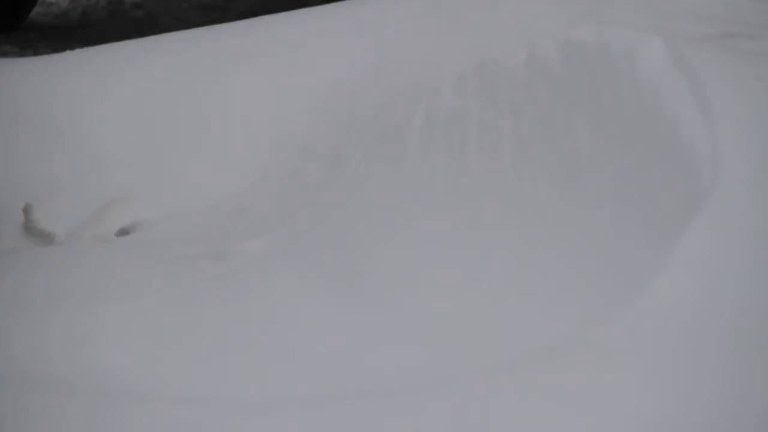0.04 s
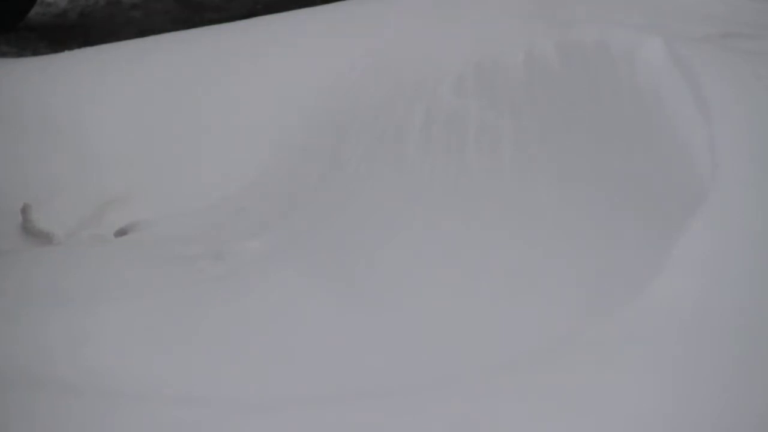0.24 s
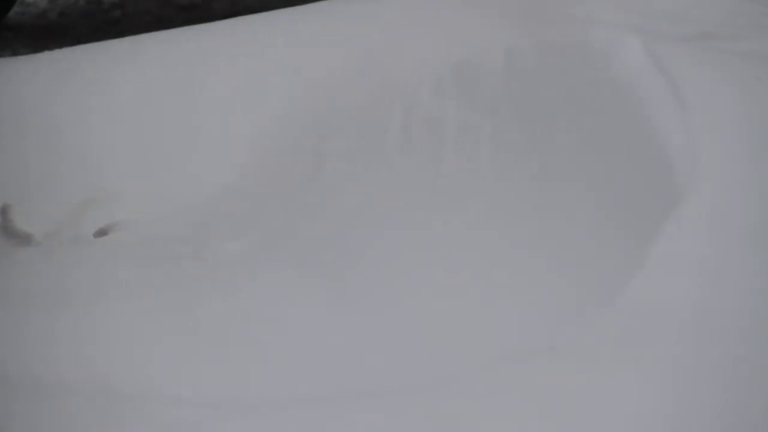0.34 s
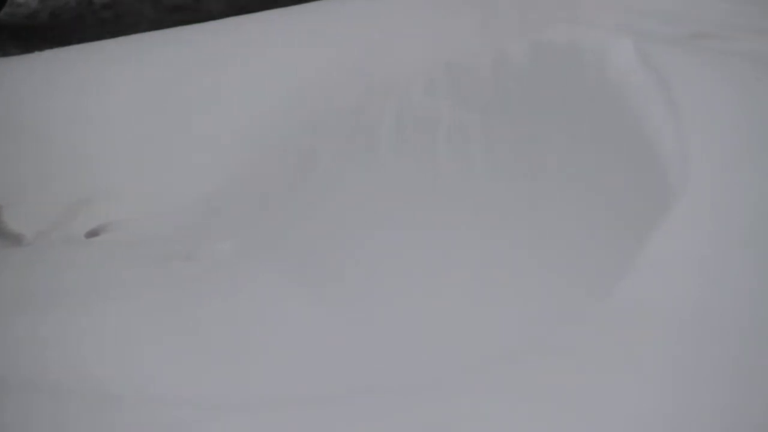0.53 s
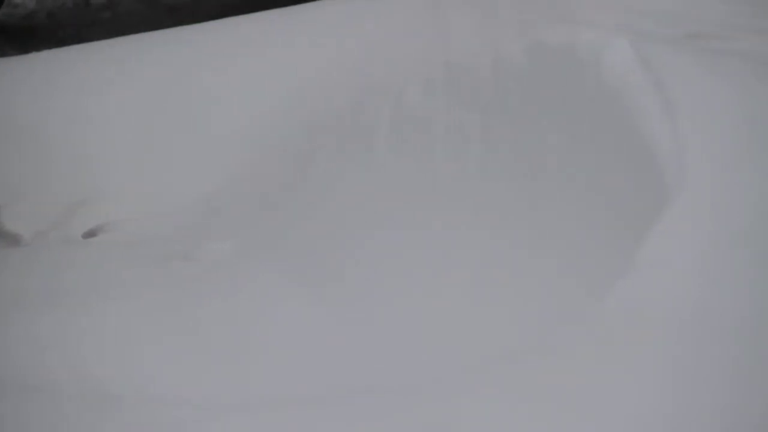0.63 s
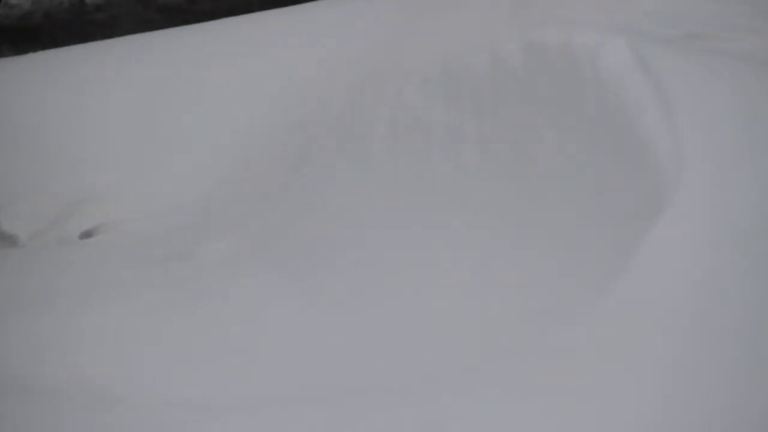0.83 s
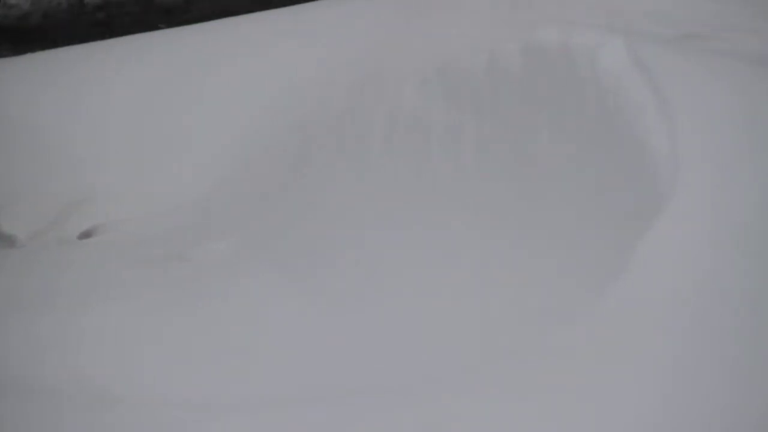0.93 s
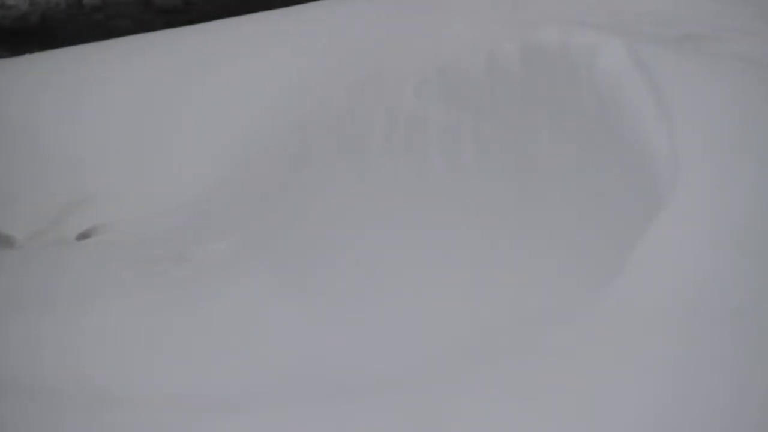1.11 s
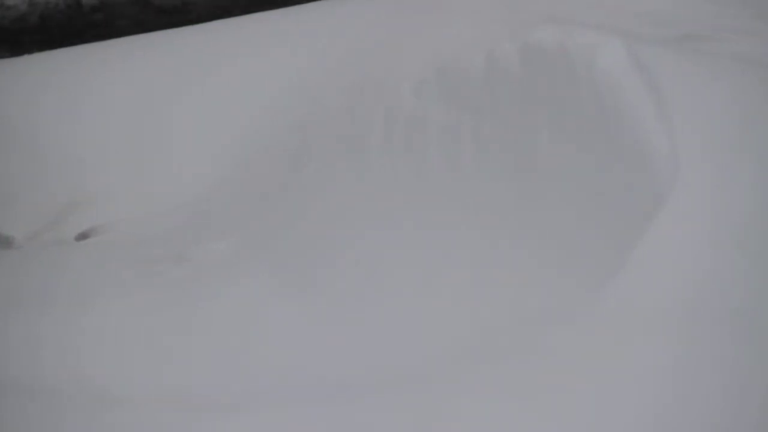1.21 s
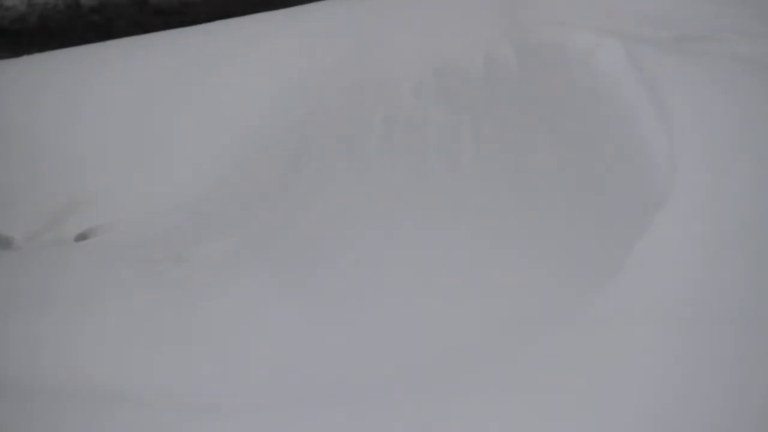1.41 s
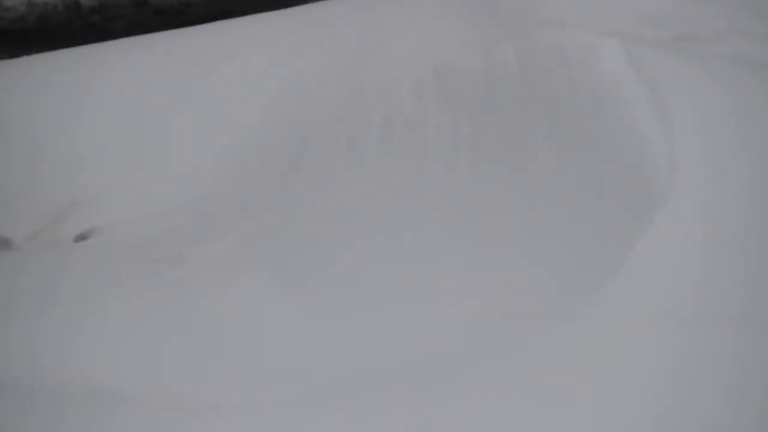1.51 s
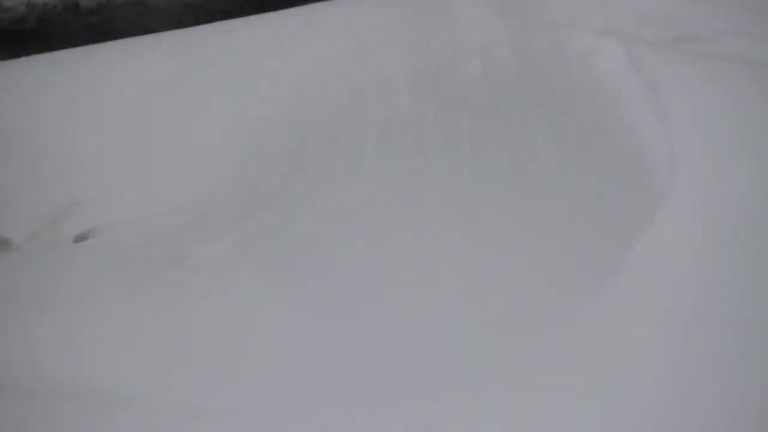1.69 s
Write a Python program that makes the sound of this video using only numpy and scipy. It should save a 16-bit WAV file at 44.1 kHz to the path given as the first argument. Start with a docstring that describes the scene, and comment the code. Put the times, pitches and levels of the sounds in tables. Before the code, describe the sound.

Light wind rumbles and buffets the microphone, with a faint hiss of drifting snow.

```python
"""Light wind over a snow field. From the start, air rushes softly, drifting snow hisses and single grains
tick nearby, while turbulence rumbles at the microphone port and eddies buffet it with short low thuds.
The hardest thud comes at 0.36 s. After 1 s the thuds crowd together, the rush grows and one soft bump
rings the housing. Towards the end a gust brings a coarser sweep of snow and the rumble falls away."""
import sys
import numpy as np
from scipy import signal
from scipy.fft import rfft, irfft, next_fast_len
from scipy.io import wavfile

SR = 44100
rng = np.random.default_rng(int(sys.argv[2]) if len(sys.argv) > 2 else 0)


def master(y):
    """Save y as 16-bit WAV."""
    cut = np.clip(np.atleast_2d(y).T, -1, 1)
    pcm = np.round(cut * 32767)  # scale
    wavfile.write(sys.argv[1], SR, pcm.astype(np.int16))


N = 77175
T = np.arange(N) / SR


# Eddies at the port: centre_s, peak_db, pitch_hz, half_length_s
PORT_EDDIES = [(0.082, -23, 78, 0.011), (0.086, -31, 334, 0.0019), (0.102, -21.5, 126, .005),
               (0.318, -26, 74, 0.017), (0.362, -10, 136.3, 0.008), (0.416, -21.5, 92, .009),
               (0.516, -20, 317, 0.0013), (0.524, -27.5, 137, .011), (0.653, -28, 334, 0.0018),
               (0.661, -20, 115, 0.011), (0.723, -25, 117, .012), (1.035, -29.5, 110, 0.0069),
               (1.102, -25, 223, 0.0036), (1.169, -14, 145, 0.0062), (1.176, -21.5, 251.4, 0.0095),
               (1.204, -12.5, 154, 0.0038), (1.206, -24.5, 352, 0.0024), (1.296, -15.5, 105, 0.0034),
               (1.306, -19.5, 164, 0.0046), (1.342, -28, 191, 0.0082), (1.383, -15.5, 160, .005),
               (1.412, -19, 97, .006), (1.432, -22.5, 256, 0.0027), (1.458, -29, 170, 0.0064)]
# Wake spectrum: freq_hz, density_db
WAKE_SPECTRUM = [(25, -10), (60, -2.5), (130, 0.5), (250, -4.5), (450, -10.5), (800, -30.5), (1600, -52)]

def buffets(push_db=-8.5, push_pitch_ratio=0.46, wake_db=-13.5, wake_length_ratio=1.93, leak_hz=30):
    """Each eddy swings the port pressure for a cycle or two, pushes more slowly and churns a wake."""
    pressure, wake_power = np.zeros(N), np.zeros(N)
    for centre_s, peak_db, pitch_hz, half_length_s in PORT_EDDIES:
        swing_phase, push_phase = rng.random(2)
        age_s = T - centre_s
        swell = from_db(peak_db) * (1 + .5 * (age_s / half_length_s) ** 2) ** -2
        swing = np.sin(2 * np.pi * (pitch_hz * age_s + swing_phase))
        push = np.sin(2 * np.pi * (push_pitch_ratio * pitch_hz * age_s + push_phase))
        pressure += swell * (swing + from_db(push_db) * push)
        wake_s = half_length_s * wake_length_ratio
        wake_power += from_db(peak_db) ** 2 * np.exp(-2 * np.abs(age_s) / wake_s)
    wake = from_db(wake_db) * np.sqrt(wake_power) * noise(WAKE_SPECTRUM)
    # Slow pressure changes leak past the diaphragm.
    leak = signal.butter(2, leak_hz, "high", fs=SR, output="sos")
    return signal.sosfilt(leak, pressure) + wake


# Rumble envelope: time_s, level_db
RUMBLE_ENVELOPE = [(0, -40.5), (.2, -40.5), (.4, -36.5), (.58, -43), (.82, -40), (.95, -37.5), (1.1, -39.5),
                   (1.25, -34.5), (1.45, -35), (1.62, -44), (1.75, -48)]
# Rumble spectrum: freq_hz, density_db
RUMBLE_SPECTRUM = [(20, -31), (40, -3.5), (80, -0.5), (130, -6), (200, -12.5), (350, -28.5), (700, -24.5)]

def port_rumble():
    """Continuous turbulence at the microphone port."""
    return envelope(RUMBLE_ENVELOPE) * noise(RUMBLE_SPECTRUM) * flutter(depth_db=2.5, rate_hz=13.3)


# Rush envelope: time_s, level_db
RUSH_ENVELOPE = [(0, -45.5), (.3, -44), (.6, -44), (.95, -44), (1.2, -40.5), (1.4, -42), (1.55, -42),
                 (1.75, -43.5)]
# Rush spectrum: freq_hz, density_db
RUSH_SPECTRUM = [(100, -2.5), (250, 1.5), (420, 0), (650, -5), (1000, -11), (1600, -18), (2600, -24.5),
                 (5000, -40), (10000, -40)]

def air_rush():
    """Air flows unsteadily over the field."""
    return envelope(RUSH_ENVELOPE) * noise(RUSH_SPECTRUM) * flutter(depth_db=0.96, rate_hz=9.7)


# Hiss envelope: time_s, level_db
HISS_ENVELOPE = [(0, -49), (.4, -49.5), (.58, -48.5), (.75, -49.5), (1.0, -49), (1.3, -49), (1.5, -48.5),
                 (1.75, -46.5)]
# Hiss spectrum: freq_hz, density_db
HISS_SPECTRUM = [(1000, -20), (2500, -9), (4500, -5), (6500, -6.5), (9000, -3), (11500, 0), (13000, 1),
                 (14500, -3.5), (16000, -10.5)]

def snow_hiss(grains_per_s=700, spread_db=4.5, grains_db=-9.5, t60_cycles=4.5):
    """Fine drifting snow: a smooth hiss plus countless tiny ringing impacts."""
    sizes = from_db(spread_db * np.minimum(rng.exponential(1, N), 5))
    signs = rng.choice([-1, 1], N)
    clicks = sizes * signs * (rng.random(N) < grains_per_s / SR)
    pitches_hz = np.geomspace(7000, 14500, 10)
    pitch_index = rng.integers(0, len(pitches_hz), N)
    grains = sum(ring(clicks * (pitch_index == k), hz, t60_cycles / hz)
                 for k, hz in enumerate(pitches_hz))
    return envelope(HISS_ENVELOPE) * (noise(HISS_SPECTRUM) + from_db(grains_db) * unit_rms(grains))


# Sweep envelope: time_s, level_db
SWEEP_ENVELOPE = [(0, -67), (1.0, -66), (1.25, -60.5), (1.48, -53.5), (1.63, -46.5), (1.75, -50.5)]
# Sweep spectrum: freq_hz, density_db
SWEEP_SPECTRUM = [(500, -11), (1200, 8), (2200, -0.5), (3500, -0.5), (5000, 0.5), (7500, -12),
                  (12000, -1.5), (16000, -16)]

def snow_sweep():
    """A late gust drives a coarser sweep of snow."""
    return envelope(SWEEP_ENVELOPE) * noise(SWEEP_SPECTRUM)


# Grain landings: start_s, level_db, centre_hz, t60_s, bandwidth_ratio
GRAIN_LANDINGS = [(0.127, -43, 10000, .010, .6), (0.1443, -35.5, 10800, .010, .45),
                  (0.333, -45, 4800, 0.048, 0.44), (0.421, -45, 4800, .025, 0.55),
                  (0.500, -44, 8000, .005, .9), (0.521, -40, 7000, .007, 1.1),
                  (0.812, -37, 11000, .012, 0.57), (0.994, -38, 10100, 0.022, 0.88),
                  (1.085, -41.5, 2370, 0.018, .4), (1.105, -35, 10650, .018, .12),
                  (1.193, -38, 9000, 0.0064, 0.45), (1.340, -40.5, 6000, 0.0058, 1.2),
                  (1.361, -39, 2000, 0.017, .9)]

def grain_ticks():
    """Larger grains land near the microphone, one noise burst each."""
    return sum(from_db(level_db) * burst(start_s, centre_hz, t60_s, bandwidth_ratio)
               for start_s, level_db, centre_hz, t60_s, bandwidth_ratio in GRAIN_LANDINGS)


# Housing modes: pitch_hz, level_db, t60_s
HOUSING_MODES = [(355, -1, 0.045), (593, 0.5, 0.048), (727, -1, 0.033), (925, -8.5, 0.052),
                 (1368, -6, 0.047), (2120, -11, 0.029), (2700, -15.5, .018), (3270, -15.5, 0.014)]

def housing_bump(start_s=1.1858, body_db=-27, crunch_db=-33):
    """A soft knock rings the housing, with a short crunch at the contact."""
    click = np.zeros(N)
    click[int(start_s * SR)] = 1
    body = sum((-1) ** k * from_db(level_db) * ring(click, pitch_hz, t60_s)
               for k, (pitch_hz, level_db, t60_s) in enumerate(HOUSING_MODES))
    crunch = burst(start_s, centre_hz=2080, t60_s=0.017, bandwidth_ratio=1.1)
    return from_db(body_db) * body + from_db(crunch_db) * crunch


def from_db(db):
    """Decibels to gain."""
    return 10 ** (np.asarray(db) / 20)


def unit_rms(x):
    """Scale to rms 1."""
    return x / np.sqrt(np.mean(x ** 2) + 1e-20)


def envelope(points):
    """Gain over time from time_s, level_db points."""
    return from_db(np.interp(T, *np.transpose(points)))


def noise(spectrum):
    """Noise of rms 1 shaped by freq_hz, density_db points, rolled off beyond both ends."""
    freq_hz, density_db = np.transpose(spectrum)
    size = next_fast_len(N)
    bins_hz = np.maximum(np.arange(size // 2 + 1) * SR / size, 1)
    gain = from_db(np.interp(np.log(bins_hz), np.log(freq_hz), density_db))
    rolloff = np.minimum(bins_hz / freq_hz[0], 1) * np.minimum(freq_hz[-1] / bins_hz, 1) ** 2
    return unit_rms(irfft(rfft(rng.standard_normal(size)) * gain * rolloff, size)[:N])


def flutter(depth_db, rate_hz):
    """Random unsteadiness of the flow, as a gain; depth_db is rms."""
    hop, settle_steps = 40, 2000
    pole = np.exp(-2 * np.pi * rate_hz * hop / SR)
    white = rng.standard_normal(N // hop + 2 + settle_steps)
    slow = signal.lfilter([1], [1, -2 * pole, pole * pole], white)[settle_steps:]
    drift = np.interp(np.arange(N) / hop, np.arange(len(slow)), unit_rms(slow))
    return from_db(depth_db * drift)


def ring(clicks, pitch_hz, t60_s):
    """Resonator: a unit click starts a decaying sine of height 1."""
    radius = from_db(-60 / (t60_s * SR))
    step_rad = 2 * np.pi * pitch_hz / SR
    feedback = [1, -2 * radius * np.cos(step_rad), radius * radius]
    return signal.lfilter([0, np.sin(step_rad)], feedback, clicks + 1e-18)


def burst(start_s, centre_hz, t60_s, bandwidth_ratio):
    """A sudden, decaying puff of noise in one band."""
    edge_ratio = 1 + bandwidth_ratio / 2
    edges_hz = [centre_hz / edge_ratio, min(centre_hz * edge_ratio, .45 * SR)]
    band = signal.butter(2, edges_hz, "band", fs=SR, output="sos")
    decay = (T >= start_s) * from_db(-60 * np.maximum(T - start_s, 0) / t60_s)
    return decay * unit_rms(signal.sosfilt(band, rng.standard_normal(N)))


def scene():
    """All sources at one microphone."""
    wind = port_rumble() + air_rush() + buffets()
    snow = snow_hiss() + snow_sweep() + grain_ticks()
    return (wind + snow + housing_bump())[None]


def record(dry):
    """A steep low-pass cuts the top treble."""
    cutoff_hz = 15800
    return signal.sosfilt(signal.ellip(12, .1, 90, cutoff_hz, fs=SR, output="sos"), dry)


dry = scene()
out = record(dry)
master(out)
```